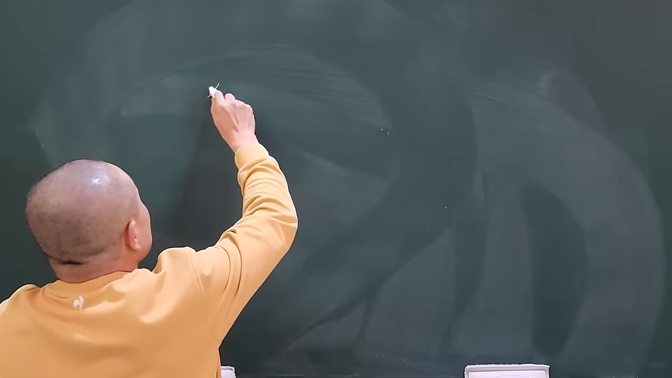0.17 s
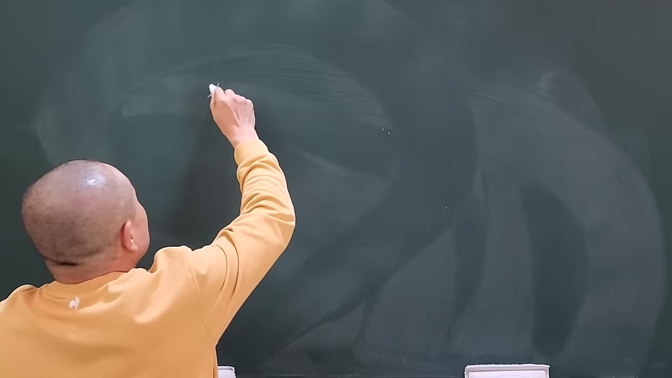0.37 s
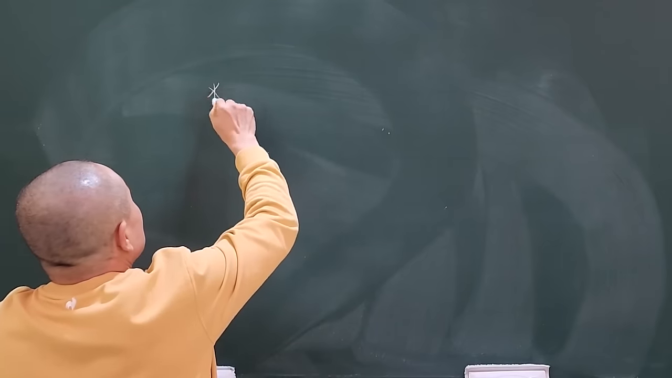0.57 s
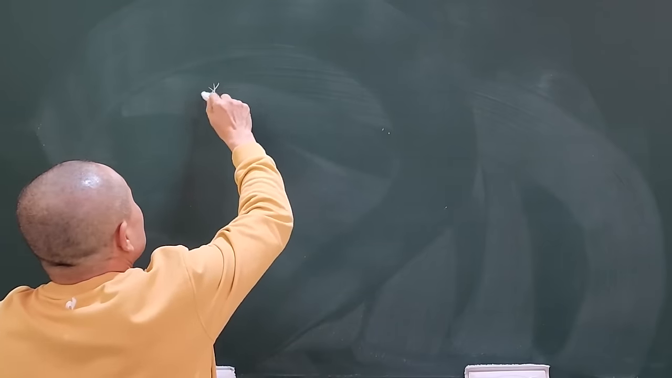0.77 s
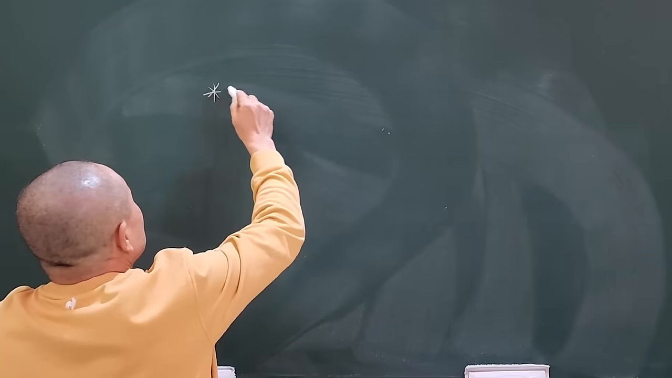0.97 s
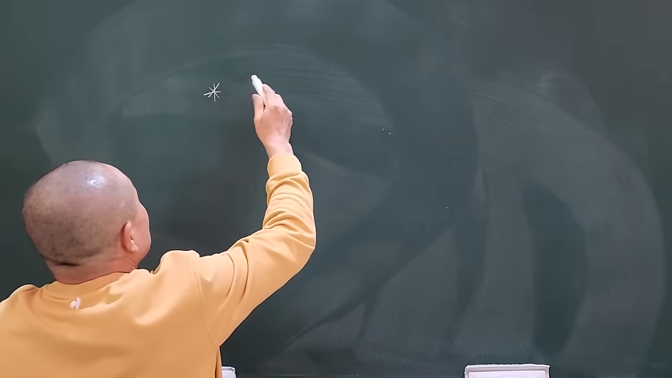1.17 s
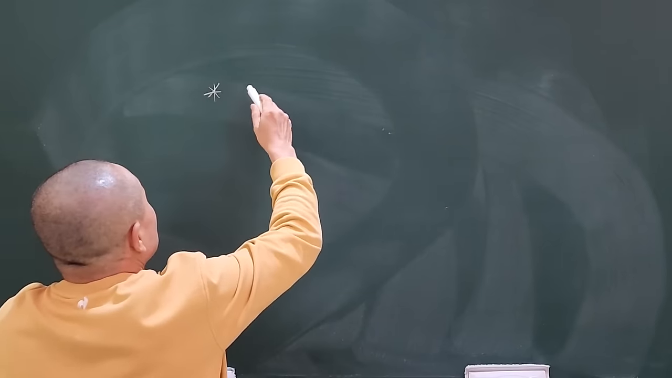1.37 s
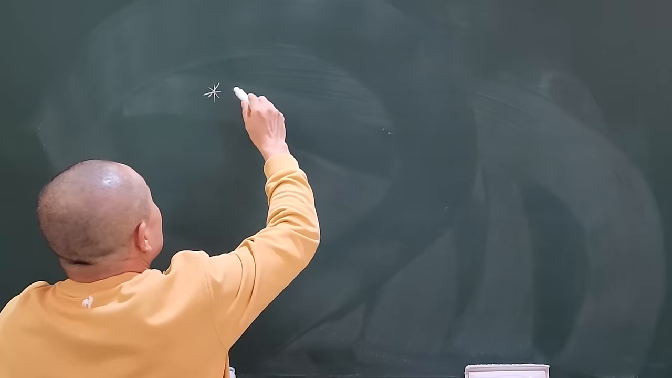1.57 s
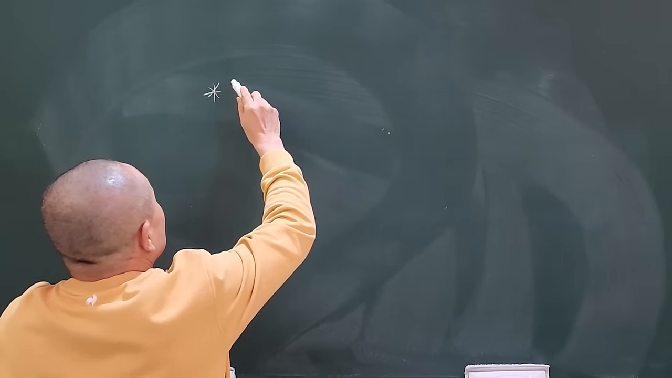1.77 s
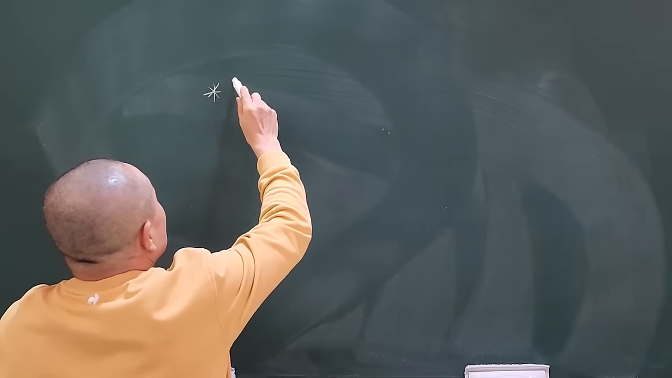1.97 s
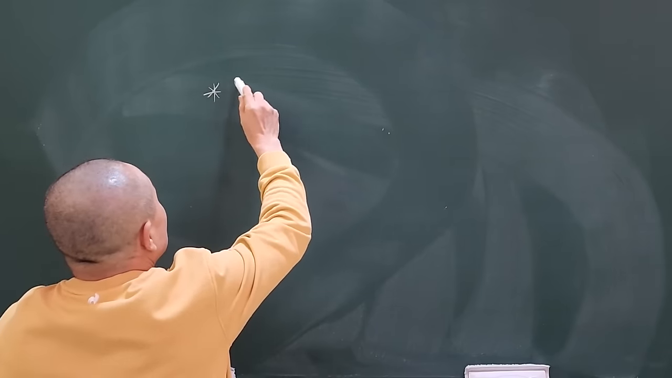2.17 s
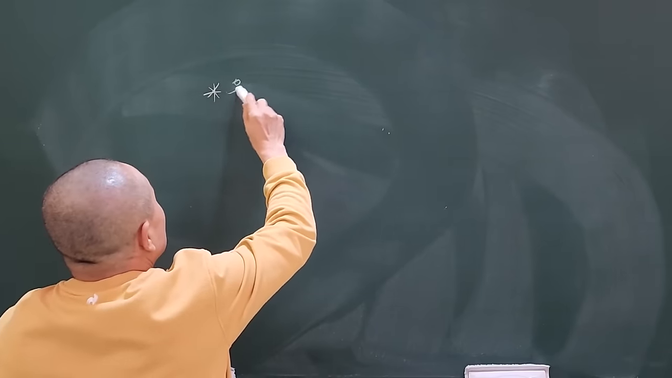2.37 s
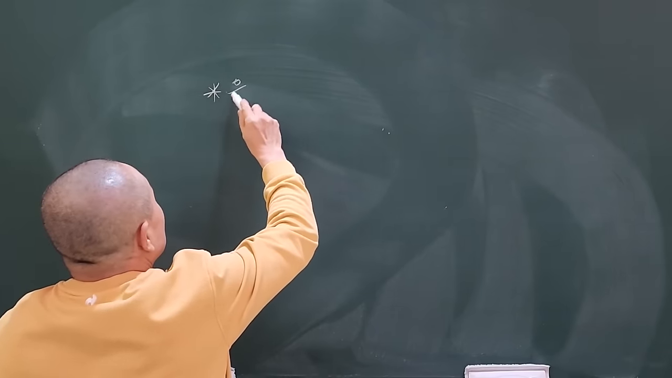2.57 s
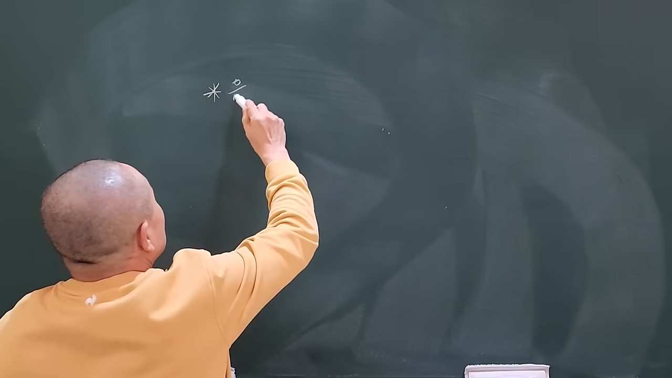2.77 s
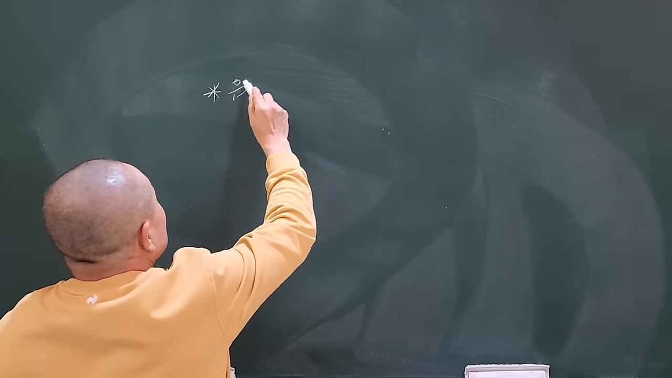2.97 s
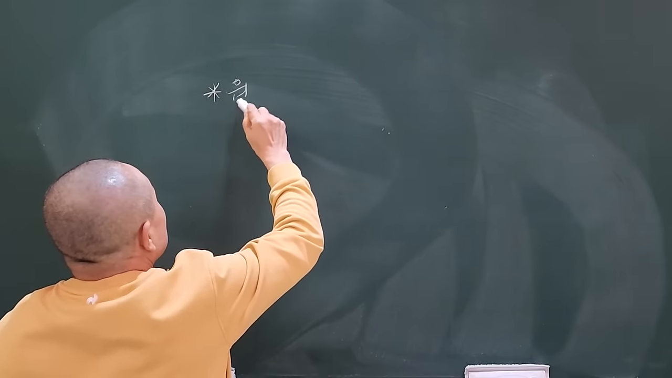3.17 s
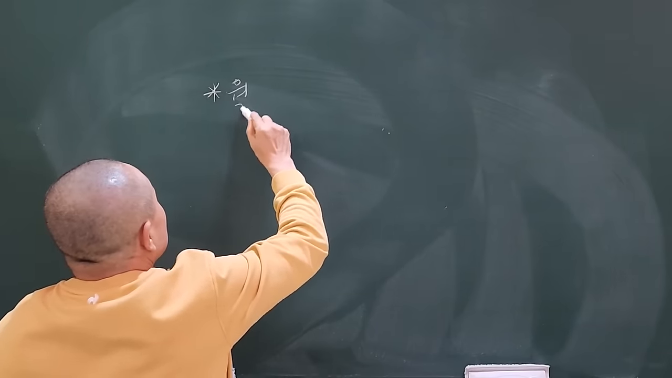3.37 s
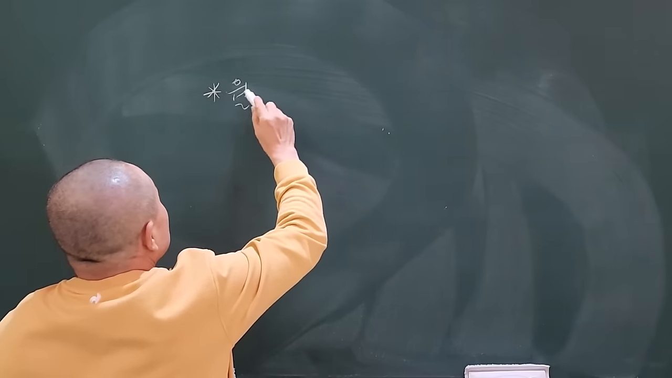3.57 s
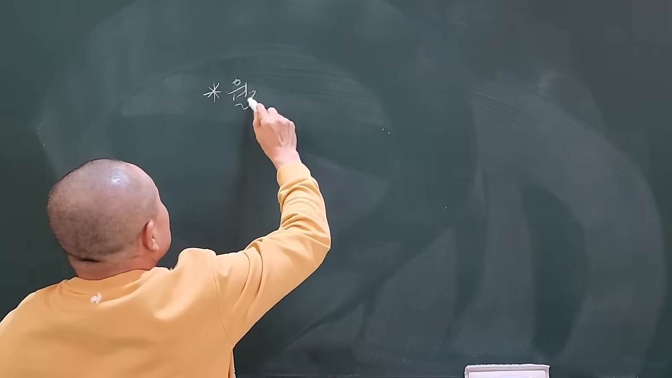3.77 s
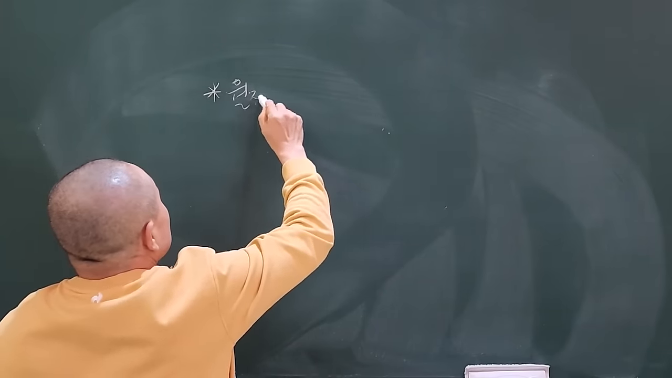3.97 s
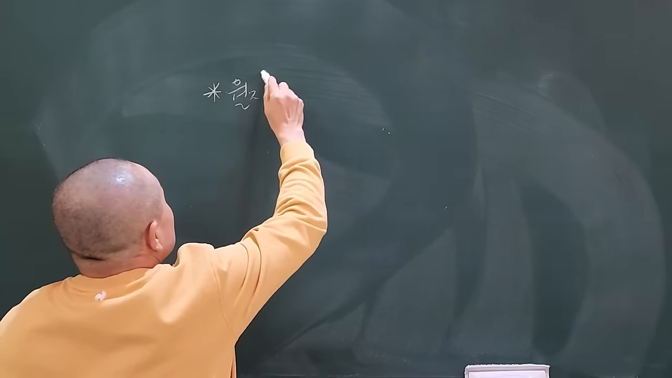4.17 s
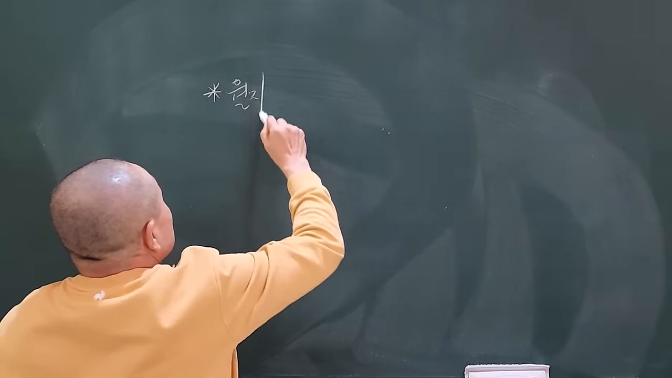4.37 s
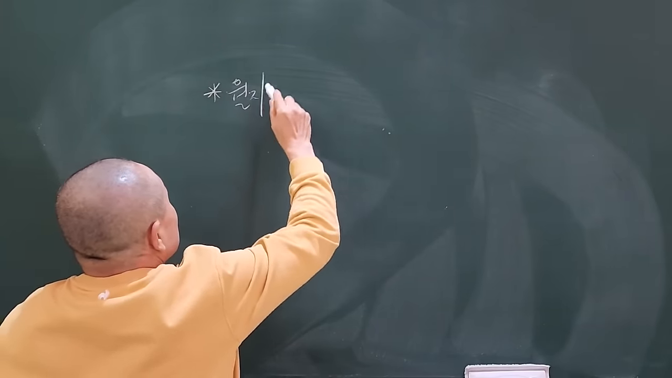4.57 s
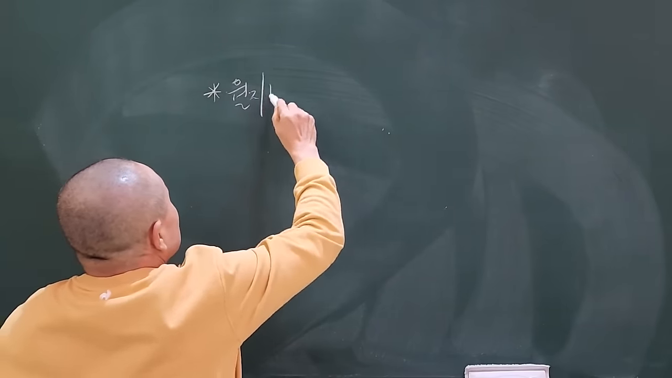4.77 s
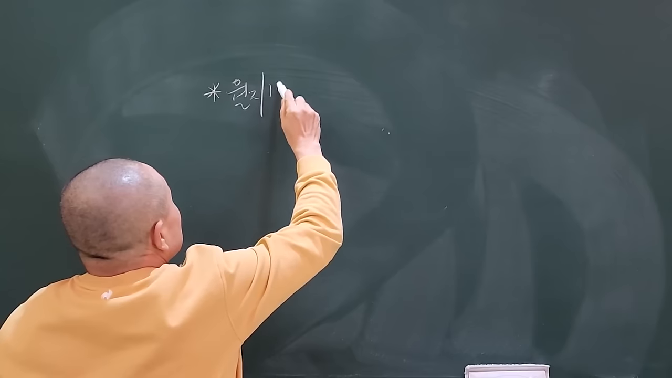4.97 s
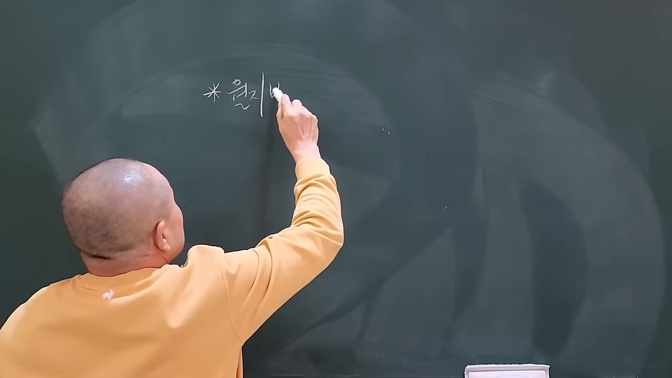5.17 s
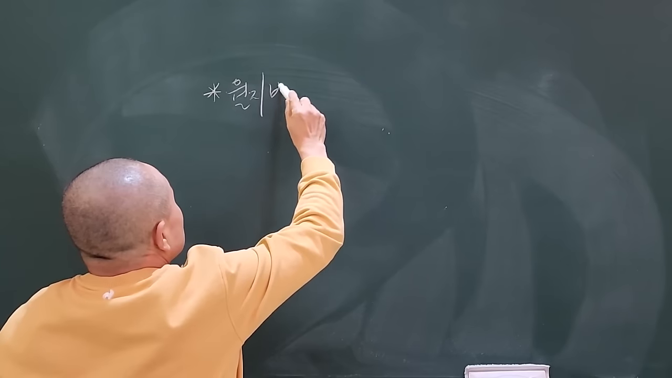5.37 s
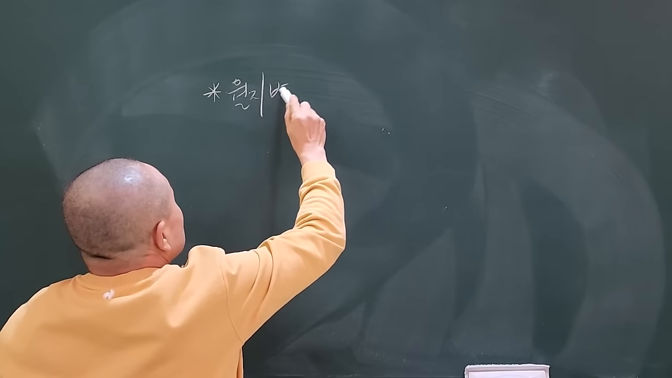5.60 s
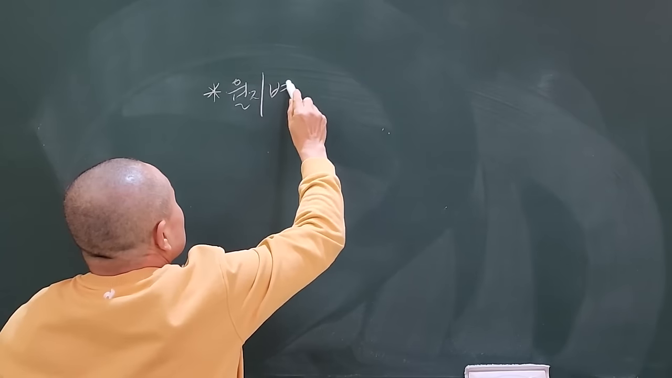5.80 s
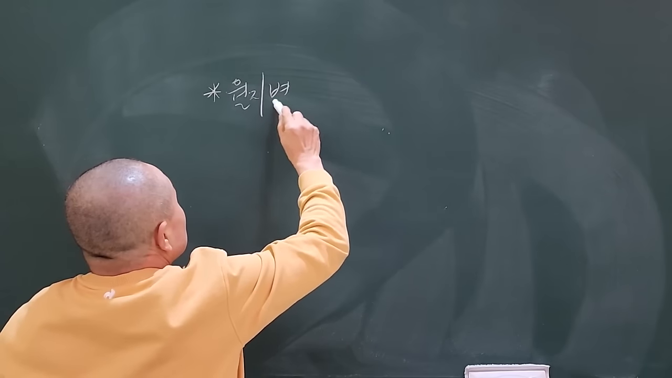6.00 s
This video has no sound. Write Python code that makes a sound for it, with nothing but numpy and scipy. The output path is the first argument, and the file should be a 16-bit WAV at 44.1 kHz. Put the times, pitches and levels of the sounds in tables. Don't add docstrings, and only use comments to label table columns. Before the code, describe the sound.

Chalk clicks and knocks woodily on a wall-mounted blackboard, with short dry hissing strokes between taps, in a small, softly humming classroom.

```python
import sys
import numpy as np
from scipy import signal
from scipy.fft import rfft, irfft, next_fast_len
from scipy.io import wavfile

SR = 44100
rng = np.random.default_rng(int(sys.argv[2]) if len(sys.argv) > 2 else 0)


def store_pcm(level_fs):
    pcm = np.round(np.clip(level_fs, -1, 1) * 32767).astype(np.int16)
    wavfile.write(sys.argv[1], SR, np.atleast_2d(pcm).T)


def nominal_scale(level):
    x = np.asarray(level, float) / 20
    return 10 ** x


N = 266231

# (time [s], blow [dB], low board modes [dB], middle modes [dB], wall thump [dB])
TAPS = [(0.2182, -20, -14.5, -7, -27), (0.5226, -20.5, -9, -8, -25.5), (0.818, -18.5, -5.5, -3, -22.5),
        (2.0005, -24.5, -5, -9.5, -30), (2.369, -28, -10, -11.5, -20), (2.6274, -24.5, -7, -9.5, -20.5),
        (2.8282, -20.5, -9.5, -11.5, -24), (3.3123, -23, -6, -10, -20.5), (3.6885, -19.5, -9, -10.5, -21),
        (4.2281, -23.5, -1.5, -8.5, -21.5), (4.7176, -19, -5.5, -11, -25.5),
        (4.995, -19.5, -6.5, -9, -23.5), (5.4267, -16, -6.5, -10, -23), (5.6161, -32, -7.5, -9.5, -23),
        (5.8167, -28, -4, -4.5, -21.5)]
# (tick over the blow [dB], pitch [Hz], crumbling grit [dB],
# thin crack over the tick [dB], crunch over the blow [dB])
TICKS = [(-4.5, 5480, -53.5, -22, -7.5), (-7.5, 5760, -61, -19, -9.5), (-11.5, 5540, -52, -18, -7.5),
         (-6, 5870, -60, -22, -7), (0, 5830, -64, -19, -8.5), (-2.5, 6100, -39.5, -17, -10.5),
         (-5.5, 5620, -51.5, -19, -9.5), (-5, 5740, -48.5, -17, -7), (-6.5, 5730, -48.5, -17.5, -9),
         (-13.5, 5550, -50.5, -17, -14), (-8.5, 6030, -46.5, -15.5, -7.5), (-8, 5750, -50, -30, -11),
         (-6.5, 6230, -37.5, -20, -8.5), (-13.5, 5100, -74, -16, -10), (-15, 5000, -74, -25, -16)]
# (frequency [Hz], level [dB])
HISS = [(3000, -10.5), (8000, 3.5), (10500, 4), (12000, 3.5), (14500, 1.5), (16000, 5)]


def evened(x):
    return x / np.sqrt(np.mean(x ** 2) + 1e-20)


def read(points, hz):
    f, value = np.transpose(points)
    return np.interp(np.log(hz + 1), np.log(f + 1), value)


def coloured(x, points):
    size = next_fast_len(len(x))
    gain = nominal_scale(read(points, np.fft.rfftfreq(size, 1 / SR)))
    return evened(irfft(rfft(x, size) * gain, size)[:len(x)])


def resonate(x, hz, width):
    r = np.exp(-np.pi * width / SR)
    return evened(signal.lfilter([1], [1, -2 * r * np.cos(2 * np.pi * hz / SR), r * r], x))


def ring(modes, rise, scatter_db, detune):
    hz, db, t60 = np.transpose(modes)[:, :, None]
    t60 = np.minimum(t60, 23 / hz)
    t = np.arange(SR // 3) / SR
    spot = rng.standard_normal((len(modes), 2))
    level = nominal_scale(db + scatter_db * spot[:, :1] - 60 * t / t60)
    pitch = hz * (1 + detune * spot[:, 1:])
    lines = level * np.sin(2 * np.pi * pitch * t)
    return lines.sum(0) * (1 - np.exp(-t / rise))


def add(mix, s, sound):
    part = mix[round(s * SR):][:len(sound)]
    part += sound[:len(part)]


def dust(per_s, spread_db):
    size = nominal_scale(spread_db * np.minimum(rng.exponential(1, N), 4))
    return size * rng.standard_normal(N) * (rng.random(N) < per_s / SR)


def arches(rows):
    out = np.zeros(N)
    for s, length, db, top in rows:
        u = np.linspace(0, 1, round(length * SR))
        skew = np.log(.5) / np.log(np.clip(top, .1, .9))
        speed = abs(np.sin(np.pi * u ** skew))
        add(out, s, nominal_scale(db) * speed ** 0.95)
    return out


def wander():
    spread_db, knot_s = 4, .12
    knots = rng.standard_normal(100)
    return nominal_scale(spread_db * np.interp(np.arange(N) / SR / knot_s, np.arange(100), knots))


def taps():
    # (frequency [Hz], level [dB], t60 [s])
    low_modes = [(312, -5.5, 0.11), (360, 0, 0.3), (236.7, -3, 0.017), (422, -12.5, .06)]
    middle_modes = [(606, -0.5, 0.24), (457, -12, 0.073), (680, -4, 0.024)]
    high_modes = [(801, -6, 0.09), (1021, -4.5, 0.075), (1140, -55, .02), (1450, -68, 0.04),
                  (1920, -19, 0.0019)]
    thump_modes = [(62, -2, 0.21), (93.1, 1.5, 0.14), (179.7, -0.5, 0.17)]
    forerunner_modes = [(620, -7, 0.0054), (1520, -20, 0.0046)]
    crunch_band = signal.butter(2, [1800., 2900.], "band", fs=SR, output="sos")
    spots = 4
    push, crunch, boards = np.zeros(N), np.zeros(N), np.zeros((spots, N))
    t = np.arange(SR // 3) / SR
    for k, (tap, tick) in enumerate(zip(TAPS, TICKS)):
        s, db, low_db, middle_db, thump_db = tap
        tick_db, _, grit_db, _, crunch_db = tick
        board = boards[k % spots]
        s += .0014

        glance_db = 0.27 * max(grit_db - db + 31, 0)
        push_hz = 930 + 10.5 * (tick_db + 4.5)
        u = 2 * np.pi * push_hz * t - 2.5
        cycle = -u * np.exp(-u ** 2 / 2) * nominal_scale(0.21 * np.tanh(u))
        add(push, s, nominal_scale(db + 9.5 - glance_db) * cycle)

        sound = nominal_scale(2.5) * ring(high_modes, 0.00069, 0.87, 0.06)
        sound += nominal_scale(low_db + 8) * ring(low_modes, 0.0031, 1.74, 0.0019)
        sound += nominal_scale(middle_db + 13.0) * ring(middle_modes, 0.0063, 1.3, 0.013)
        sound += nominal_scale(thump_db + 12.0) * ring(thump_modes, 0.0067, 1.0, 0.038)
        add(board, s, nominal_scale(db) * sound)
        add(board, s - .0023, nominal_scale(db - 15.5) * ring(forerunner_modes, 0.00017, 1, 0.037))

        crumbs = (np.arange(len(t)) == 6) + nominal_scale(-17 - 60 * t / 0.02) * rng.standard_normal(len(t))
        add(crunch, s, nominal_scale(db + crunch_db + 27.5) * signal.sosfilt(crunch_band, crumbs))
    return push, boards, crunch


def ticks():
    # (factor on the pitch [ratio], level [dB], t60 [s])
    tip_modes = [(.75, 1.5, 0.0004), (1.0, -1, 0.0024), (1.17, -4.5, 0.0019), (1.45, -13.5, 0.004)]
    # (frequency [Hz], level [dB], t60 [s])
    crack_modes = [(10770, -1.5, 0.0018), (13200, 0.5, 0.0016), (15700, 6, 0.00085)]
    bounce_s, bounce_db = 0.0022, -7
    out = np.zeros(N)
    for (s, blow_db, *_), (db, hz, _, crack_db, _) in zip(TAPS, TICKS):
        tip = ring(np.multiply(tip_modes, [hz, 1, 1]), .0001, 0.49, 0.0053)
        crack = nominal_scale(crack_db + 7.5) * ring(crack_modes, .00005, 0.48, 0.05)
        add(out, s + 0.001504, nominal_scale(blow_db + db + 9.5) * (tip + crack))
        add(out, s + 0.0019 + bounce_s, nominal_scale(blow_db + db + 8.5 + bounce_db) * tip)
    return out


def strokes():
    # (start [s], length [s], hiss at top speed [dB],
    # place of top speed [0-1], grit over the hiss [dB])
    slides = [(0.214, .15, -61, 0.3, -7), (0.523, 0.17, -60.5, 0.25, -3), (0.833, 0.13, -55.5, 0.59, -15),
              (2.015, 0.14, -65.5, 0.37, -4), (2.135, 0.1, -63, 0.26, -6), (2.225, 0.092, -59, 0.63, -11),
              (2.385, 0.14, -58.5, 0.55, -15), (2.647, 0.17, -63.5, 0.14, 4.5),
              (2.845, 0.25, -61, 0.15, -14), (3.063, 0.19, -62.5, 0.47, -17), (3.325, 0.18, -64, 0.27, -2),
              (3.453, 0.089, -62.5, 0.62, -8), (3.7, 0.073, -61.5, 0.4, 8), (3.759, 0.091, -61.5, 0.47, 0),
              (3.83, 0.093, -65, 0.58, -2.5), (4.24, 0.27, -57.5, 0.59, -17), (4.73, 0.14, -61.5, .5, -1),
              (5.016, 0.17, -59, 0.48, -7), (5.19, 0.16, -61.5, 0.43, -11), (5.446, 0.089, -60, .5, 3),
              (5.54, 0.059, -70, .4, 4), (5.665, 0.092, -63.5, .4, -25), (5.827, 0.057, -65, 0.3, -14),
              (5.88, 0.16, -60.5, 0.28, -14)]
    # (frequency [Hz], width [Hz], level [dB])
    slide_bands = [(6040, 2700, 2.5), (8240, 1200, -3.5), (12200, 1500, -7.5), (14200, 1500, -1)]
    # (frequency [Hz], level [dB])
    grit_colour = [(600, 2), (2500, 0.5), (4300, -9.5), (5500, -4), (6900, -5.5), (8300, -12.5),
                   (9500, -19), (12000, -22)]
    crumble_t60 = 0.3
    rows = np.array(slides)
    t = np.arange(SR // 2) / SR

    coarse = arches(rows[:, :4] + rows[:, 4:] * [0, 0, 1, 0])
    for (s, *_), (_, _, grit_db, *_) in zip(TAPS, TICKS):
        add(coarse, s, nominal_scale(grit_db - 60 * t / crumble_t60) * np.minimum(t / 0.004, 1))
    grit = coloured(dust(9000., 0.59), grit_colour) * coarse

    slips = dust(16000.0, 2.4)
    hum = np.zeros(N)
    for hz, width, db in slide_bands:
        hum += nominal_scale(db) * wander() * resonate(resonate(slips, hz, width), hz, width)
    slide = nominal_scale(1.5) * coloured(slips, HISS) + nominal_scale(-6) * evened(hum)
    return nominal_scale(2.5) * slide * arches(rows[:, :4]) + nominal_scale(2.0) * grit


def hard_stroke():
    # (frequency [Hz], width [Hz], level [dB])
    stick_bands = [(2010, 130, 2), (2580, 310, -16), (3300, 250, -27), (4530, 120, -24), (4650, 120, 2.5),
                   (5320, 440, 7), (6110, 96, 2.5), (6530, 120, -1), (7350, 240, -6), (7890, 150, -24),
                   (8570, 780, -1), (10100, 250, -8), (9900, 160, -25), (10700, 200, -4), (11400, 340, 0),
                   (11630, 310, -6), (11800, 520, 5), (12200, 290, 2), (13600, 320, -5), (14450, 250, 5),
                   (14800, 300, -1), (15600, 180, -19)]
    rumble_colour = [(150, -2.5), (300, -4), (600, -1.5), (1000, -13.0), (1600, -16.0), (3000, -17.5)]
    slips = dust(15000., 2.2)
    stick = np.zeros(N)
    for hz, width, db in stick_bands:
        stick += nominal_scale(db) * resonate(resonate(slips, hz, 1.4 * width), hz, 1.4 * width)
    friction = evened(stick) + nominal_scale(-6.5) * coloured(slips, HISS)
    rumble = coloured(rng.standard_normal(N), rumble_colour)

    t = np.arange(N) / SR
    eased_db = -94 * t
    lifted_db = -550 * np.maximum(t - 0.191, 0)
    rumble_db = -1.5 + 0.68 * eased_db
    return nominal_scale(-35.5 + lifted_db) * (nominal_scale(eased_db) * friction + nominal_scale(rumble_db) * rumble)


def hand():
    # (start [s], length [s], level [dB], place of top speed [0-1])
    sleeve = [
        (.99, 0.11, -84, 0.2),
        (1.09, 0.26, -76.5, 0.14),
        (1.26, .12, -84, .5),
        (1.93, 0.053, -85, 0.6),
        (3.03, .1, -100, 0.08),
        (4.39, 0.26, -74, 0),
        (5.19, 0.16, -86, 0.7),
    ]
    # (frequency [Hz], level [dB])
    cloth = [(250, 3), (500, 5), (800, 10), (1500, -17.5), (2800, -12.5), (5000, -31.5)]
    # (time [s], level [dB], pitch [Hz])
    knocks = [
        (1.468, -57.5, 660),
        (1.504, -49.5, 620),
        (2.285, -56.5, 930),
        (3.202, -59, 1090),
    ]
    out = arches(sleeve) * nominal_scale(11.5) * coloured(dust(3000., 3.6), cloth)
    for s, db, hz in knocks:
        add(out, s, nominal_scale(db + 9) * ring([(hz, 0, 14.4 / hz)], 0.00051, 0, 0))
    return out


def classroom(x):
    # (frequency [Hz], t60 [s])
    room_t60 = [(60, 1), (200, 0.72), (330, 0.23), (450, 0.49), (800, 0.53), (1500, 0.5), (2500, 0.48),
                (6000, 0.34), (12000, 0.3)]
    # (frequency [Hz], level [dB])
    room_colour = [(60, 5), (300, 9.5), (900, 2.5), (1700, 0.5), (2800, 5), (4000, 3), (6000, -4.5),
                   (12000, 4.5)]
    # (delay [s], level [dB])
    echoes = [(.003, -9), (.0048, -14.5), (.0105, -19.5), (.019, -11.5), (.038, -29.5), (.076, -25.5)]
    tail = np.zeros(SR)
    at = np.arange(260, SR - 20, 20)
    tail[at + rng.integers(0, 20, len(at))] = rng.choice([-1., 1.], len(at))

    hz, t, z = signal.stft(tail, SR, nperseg=256)
    decay_db = read(room_colour, hz)[:, None] - 60 * t / read(room_t60, hz)[:, None]
    tail = signal.istft(z * nominal_scale(decay_db), SR, nperseg=256)[1]

    after_wall = np.clip((np.arange(len(tail)) / SR - .108) / 0.014, 0, 1)
    tail *= nominal_scale(-1.5 * after_wall)
    tail *= nominal_scale(-6.0) / np.linalg.norm(tail)
    for k, (s, db) in enumerate(echoes):
        add(tail, s, (-1) ** k * nominal_scale(db) * np.hanning(9) / 4)
    return signal.fftconvolve(x, tail)[:N]


def ventilation():
    # (frequency [Hz], width [Hz], level [dB])
    ducts = [(61, 5.1, -53), (105.2, 1.8, -60), (171.5, 2.1, -60.5)]
    # (frequency [Hz], density [dB per Hz])
    floor_colour = [(25, -82), (45, -7.5), (100, 0.5), (135, -16.5), (170, -16), (240, -23), (370, -32.5),
                    (700, -35.5), (1300, -37.5), (2000, -42.5), (2500, -35.5), (3600, -32.5), (8000, -35.5),
                    (15700, -37.5)]
    hum = sum(nominal_scale(db) * resonate(rng.standard_normal(N), hz, width) for hz, width, db in ducts)
    return nominal_scale(-48 - 3.5) * coloured(rng.standard_normal(N), floor_colour) + hum


def scene():
    push, boards, crunch = taps()
    tip = ticks()
    blows = push + boards.sum(0) + crunch + tip
    near = strokes() + hard_stroke() + hand()

    wet = classroom(push + tip)
    wet += nominal_scale(-1.0) * sum(map(classroom, boards))
    wet += nominal_scale(-1.5) * classroom(crunch + nominal_scale(-18.0) * near)
    mix = 0.7 * blows + near + wet + ventilation()

    edge = signal.firwin(1023, 15720, window=("kaiser", 9), fs=SR)
    click_edge = signal.firwin(255, 16500, window=("kaiser", 9), fs=SR)
    clicks = 0.43 * signal.oaconvolve(blows, click_edge, "same")
    return (signal.oaconvolve(mix, edge, "same") + clicks)[None]


def top_cut(x):
    return signal.sosfilt(signal.butter(12, 16780, fs=SR, output="sos"), x)


def record(dry):
    bass_cut = signal.butter(4, 36., "high", fs=SR, output="sos")
    return top_cut(signal.sosfilt(bass_cut, dry))


dry = scene()
out = record(dry)
store_pcm(out)
```